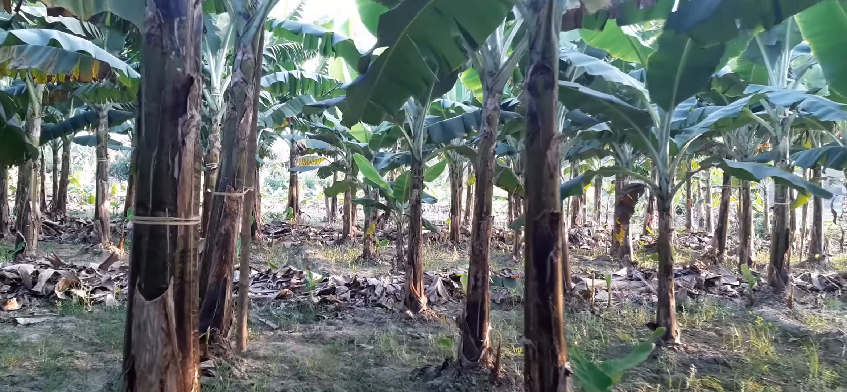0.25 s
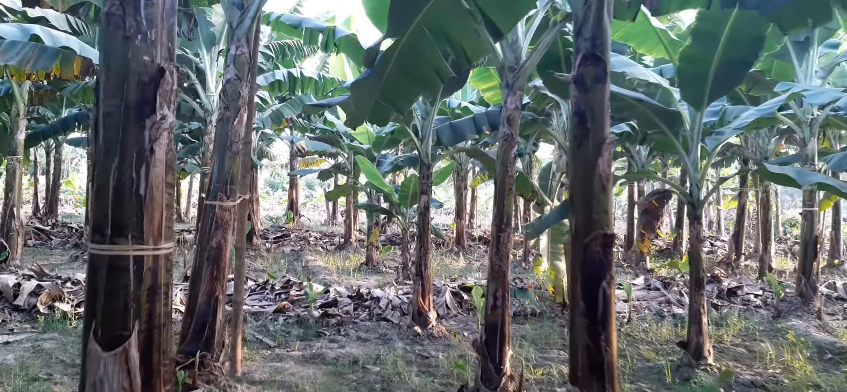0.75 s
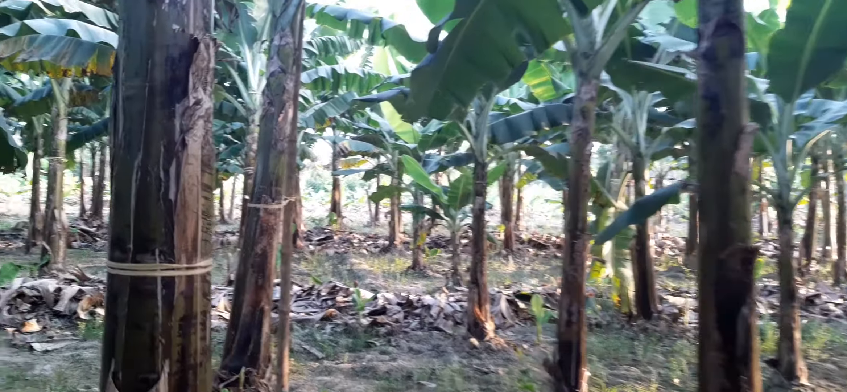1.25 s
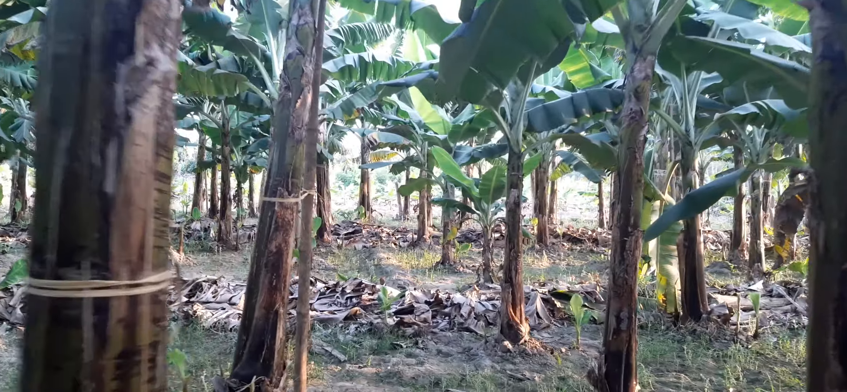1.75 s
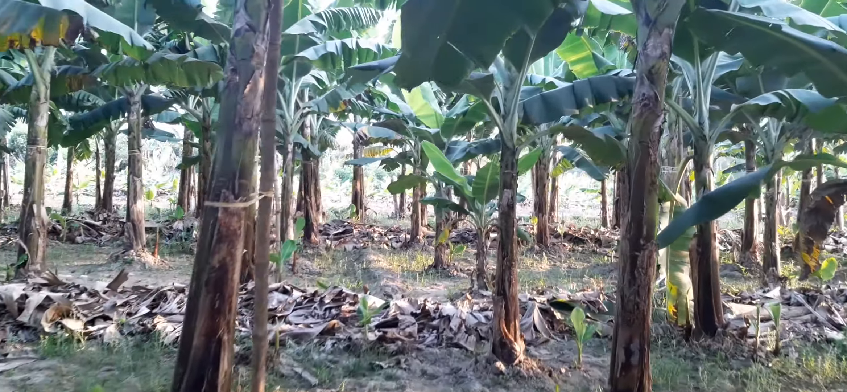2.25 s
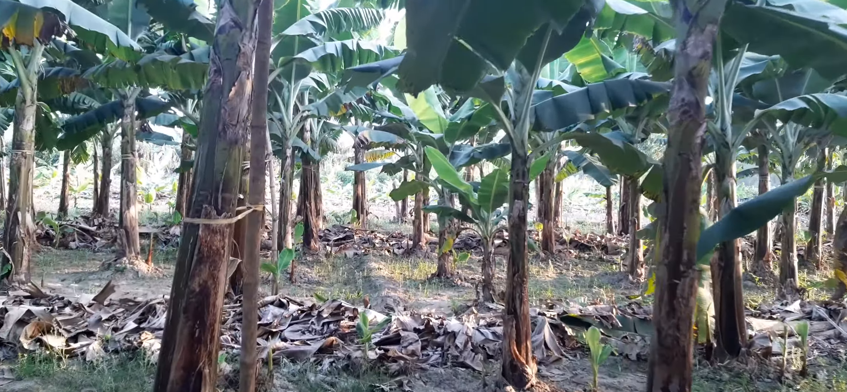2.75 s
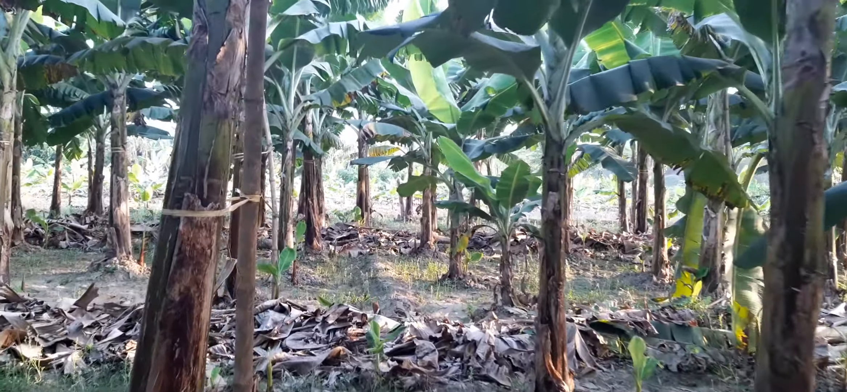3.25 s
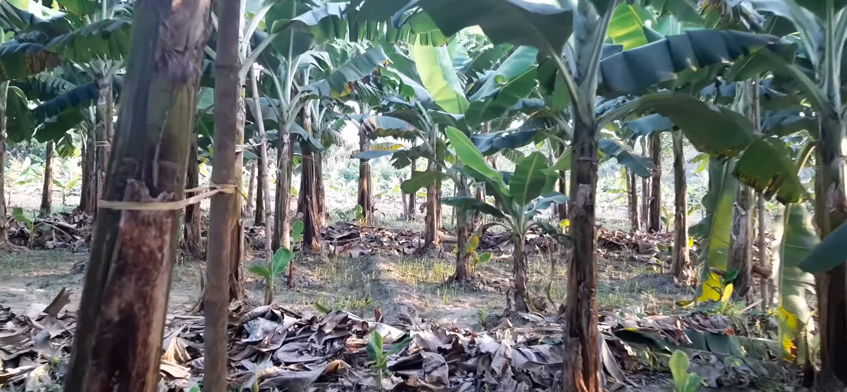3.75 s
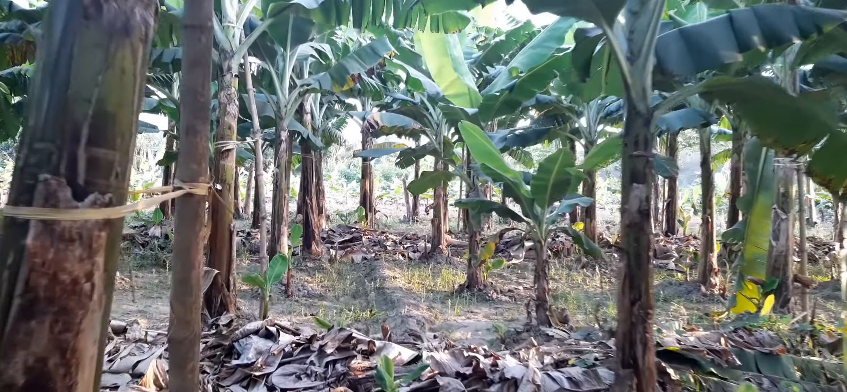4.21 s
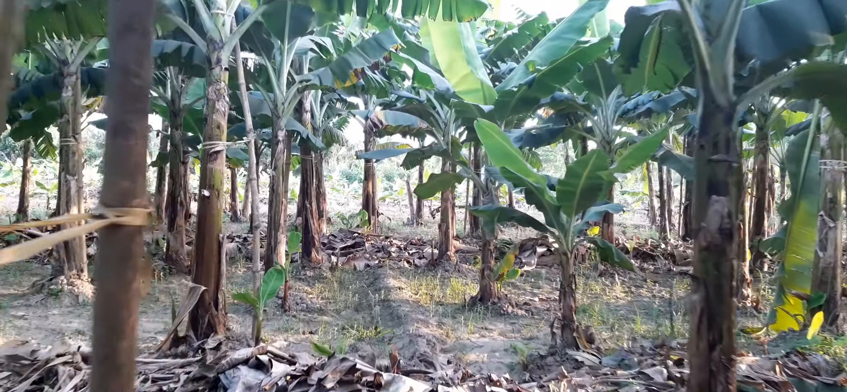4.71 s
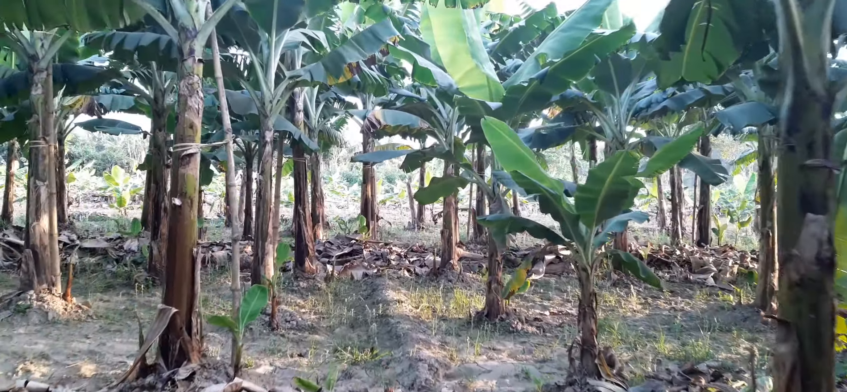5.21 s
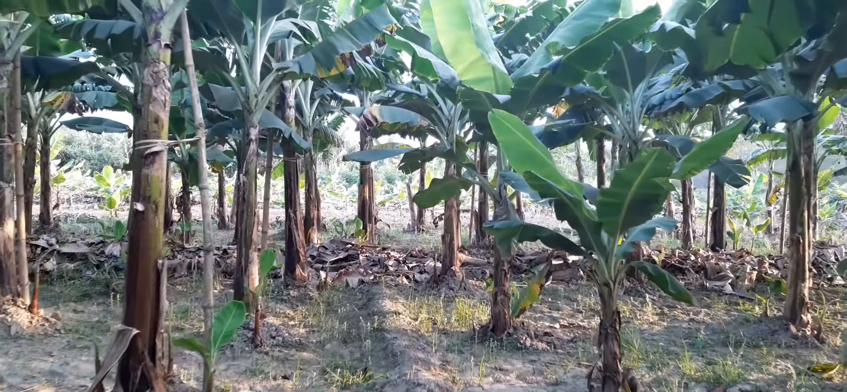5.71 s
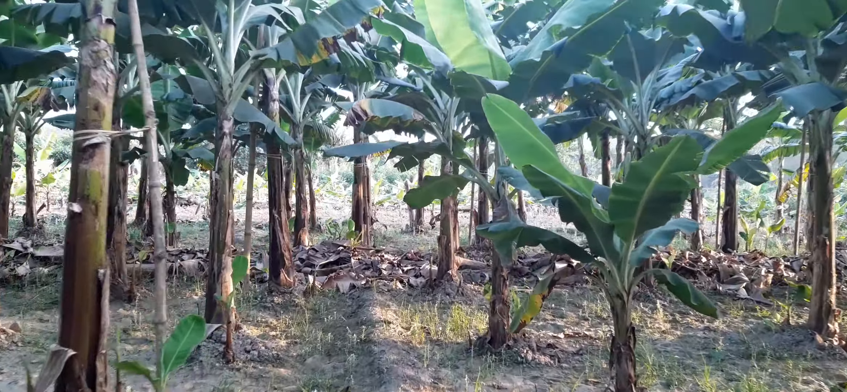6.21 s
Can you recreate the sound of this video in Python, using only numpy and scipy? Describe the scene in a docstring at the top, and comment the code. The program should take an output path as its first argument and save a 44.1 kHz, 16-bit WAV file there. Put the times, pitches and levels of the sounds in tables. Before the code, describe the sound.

Footsteps crunch and crackle through big dry fallen leaves outdoors, then brush more lightly over thin litter and grass.

```python
"""Footsteps crush a bed of big dry leaves in a plantation, then brush more lightly over litter and grass.
Each crunch is the superposition of many tiny fractures; single ribs snap out of it, and blades
spring free with a hiss. A few hollow knocks, each a heavily damped resonance, sound close by.
Behind them lie a low outdoor rumble and, in the first second, a faint, far whine."""
import sys
import numpy as np
from scipy import signal
from scipy.fft import rfft, irfft, next_fast_len
from scipy.io import wavfile
from scipy.ndimage import uniform_filter1d, map_coordinates

SR = 44100
rng = np.random.default_rng(int(sys.argv[2]) if len(sys.argv) > 2 else 0)


def pcm_store(signal):
    """Save signal as 16-bit PCM."""
    levels = np.round(np.clip(np.atleast_2d(signal), -1, 1) * 32767)
    wavfile.write(sys.argv[1], SR, levels.astype(np.int16).T)


N = 285327
TIME = np.arange(N) / SR

# Spectrum of the outdoor air. Each row: frequency in Hz, relative level in dB.
AIR_SPECTRUM = [(25, -32), (55, -4.5), (100, 2.5), (170, -12), (300, -10), (550, -17), (800, -12),
                (1300, -24.5), (4000, -35), (15000, -38.5)]
# Course of the rumble. Each row: time in seconds, level in dB.
RUMBLE_LEVELS = [(0, -59.5), (.9, -59.5), (1.3, -58.5), (3.3, -57), (4.5, -62), (5, -55), (6.1, -53),
                 (6.47, -55)]
# The whine's two glides, falling, then hovering. Each row: time in seconds, frequency in Hz, level in dB.
WHINE_GLIDES = [
    [(0, 1650, -76), (.06, 1620, -64.5), (.17, 1370, -69.5), (.27, 1320, -71), (.36, 1220, -78.5)],
    [(.54, 810, -77), (.64, 800, -64), (.72, 830, -65), (.8, 880, -69), (.9, 880, -68), (.99, 780, -69)],
]
# Spectrum of dry leaves. Each row: frequency in Hz, relative level in dB.
LEAF_SPECTRUM = [(41, -73), (70, -18.5), (228, -6.5), (274, -1), (376, -6), (494, -3), (579, -4.5),
                 (834, -2), (1280, -4), (2540, -2.5), (4280, -7.5), (7390, -11.5), (12500, -10),
                 (14900, -14), (16000, -16)]
# Blades springing free. Each row: start in seconds, level in dB, time to fall 60 dB in seconds.
BLADE_FLICKS = [(.175, -62, 0.93), (.351, -63, 0.2), (.49, -63, 0.48), (1, -48, .12), (1.447, -47, .44),
                (2.717, -20.5, 0.21), (3.832, -41, 0.46), (4.362, -50.5, 0.89), (4.474, -52, 0.22),
                (5.763, -38, .48), (6.292, -52, 0.15)]
# A foot presses or brushes the leaves. Each row: start in seconds, crunch level in dB, attack, hold
# and time to fall 20 dB in seconds, then body and crisp edges in dB relative to the crunch.
FOOT_PRESSES = [(0.335, -56, 0.017, 0.002, 0.12, 2, -9.5), (0.455, -65.5, 0.017, 0.034, 0.085, 10, -4),
                (0.997, -41.5, 0.022, 0.0067, 0.051, 3, -2), (1, -28.9, 0.1, 0.012, 0.047, 2.6, -0.2),
                (1.134, -40.0, 0.026, 0.016, 0.039, 1.5, 0.5), (1.198, -50.5, 0.029, 0.0, 0.26, 1.5, 1.5),
                (1.355, -43.0, 0.15, 0.066, 0.22, 0.3, -1.6), (1.36, -46.5, 0.018, 0.0075, 0.17, 0.5, -2.5),
                (1.58, -40.5, 0.12, 0.05, 0.1, 2.5, -1.5), (1.728, -29, 0.032, 0.0077, 0.099, -3.5, -6),
                (1.751, -20.5, 0.076, 0.088, 0.069, 0, -3.0), (1.942, -21.5, 0.11, 0.045, 0.06, -3.6, -5),
                (2.077, -24, 0.1, 0.0095, 0.097, -2.5, -3), (2.179, -29.5, 0.074, 0.045, 0.25, -0.2, -2),
                (2.35, -27.0, 0.11, 0.028, 0.06, -3.5, -6), (2.506, -41.0, 0.047, 0.076, 0.1, -3, -6.2),
                (2.66, -29.5, 0.008, 0.012, 0.098, 3, -3.4), (2.662, -26, 0.047, 0.18, 0.1, 1, -2.3),
                (2.885, -21, 0.061, 0.056, 0.19, 0.5, -1.7), (2.991, -33.5, 0.121, 0.054, 0.2, 1.5, -7),
                (3.155, -46.5, 0.25, 0.078, 0.23, 3.5, -3), (3.377, -42.5, 0.3, 0.1584, 0.2, 0, -5),
                (3.794, -31, 0.045, 0.062, 0.14, 1, -5), (3.944, -36.0, 0.059, 0.08, 0.33, -1, -8),
                (4.446, -47, 0.029, 0.0087, 0.21, 2, -5), (4.477, -45.5, 0.38, 0.012, 0.08, -6, -3.5),
                (4.847, -42.0, 0.11, 0.029, 0.15, 4, -2), (4.901, -36, 0.227, 0.016, 0.26, 1.5, -1.1),
                (5.098, -48, 0.19, 0.049, 0.8, -2.95, -5), (5.561, -45.5, 0.059, 0.11, 0.22, 1.8, -3.5),
                (5.737, -38, 0.033, 0.02, 0.078, 0.3, -2), (5.908, -48.5, 0.103, 0.052, 0.35, -1.5, -5),
                (6.381, -57.9, 0.016, 0.003, 0.081, -2.2, -1.1)]
# Deep leaves give way to thin litter on grass. Each row: time in seconds, thinness from 0 to 1.
GROUND_THINNESS = [(3, 0.01), (3.4, .4), (4.3, .45), (4.9, 0.99)]
# Direction of the feet. Each row: time in seconds, lead of the left microphone in ms.
FOOT_BEARING = [(0, .06), (1.11, 0.19), (1.8, 0.058), (3, 0.085), (4.1, .18), (5.1, -.18), (6.4, -0.13)]
# Body of a crunch: thud of the sole, pressed leaf bed, hollow curled blades. Each row: lower and upper
# edge in Hz, offset from the body level in dB, dB lost per dB of effort, dB gained on thin ground,
# dB gained per dB of dullness.
BODY_BANDS = [(62, 193, -24, 0.0244, 8, 0.83), (238.4, 575, -8.5, 0.06, 1, 0),
              (716, 960, -6, 0.1132, -5, 0.5)]
# Hollow knocks. Each row: start in seconds, level in dB, pitch in Hz.
HOLLOW_KNOCKS = [(.357, -39, 810), (0.482, -31.5, 786), (1.161, -23, 744), (2.19, -14.5, 435),
                 (2.668, -19, 353), (3.275, -26, 650), (3.916, -21.5, 820.7), (4.084, -24, 800.3),
                 (4.543, -36, 883), (5.686, -23.5, 378), (6.328, -25, 865)]
# Thick ribs and stalks breaking. Each row: start in seconds, nominal peak in dB, treble boost in dB.
RIB_SNAPS = [(.671, -52, -4), (1.16, -20.5, -11), (1.384, -23, 1), (1.45, -20, 8), (1.535, -16, 0),
             (1.752, -6.5, 10), (1.773, -5, -5), (1.877, 0, -1), (1.997, -7, -5), (2.044, -3, 2),
             (2.066, 0.5, -4.5), (2.083, -4.5, -7), (2.103, -3.5, -14), (2.178, -6, -12), (2.184, 1, -5),
             (2.22, -7, -2), (2.261, -6.5, -4), (2.294, -1.5, -8), (2.374, -2.5, 3.5), (2.447, -4.5, -0.5),
             (2.469, -3.5, 1), (2.551, -12, -4.5), (2.577, -15, -4), (2.668, -11, -15), (2.719, -2.5, 18),
             (2.838, -4.5, -6), (2.854, -0.5, -1), (2.883, -5.5, -8), (3.25, -23, -15), (3.464, -23.5, 6),
             (4.005, -15, -17), (4.477, -24, -10), (5.466, -34, -10), (6.108, -30, -4)]


def amp(db):
    """Amplitude ratio of a level in decibels."""
    return 10 ** (np.asarray(db) / 20)


def unit(x):
    """The signal normalised to rms 1."""
    return x / np.sqrt(np.mean(x ** 2) + 1e-20)


def along(points, hz):
    """A spectrum interpolated on a logarithmic frequency axis."""
    knots_hz, db = np.transpose(points)
    return np.interp(np.log(hz + 1), np.log(knots_hz), db)


def curves(rows):
    """Each column after the time, interpolated to every sample."""
    times, *columns = np.transpose(rows)
    return [np.interp(TIME, times, column) for column in columns]


def wobble(rate):
    """A smooth random modulation with rate knots a second."""
    return map_coordinates(rng.standard_normal(int(N * rate / SR) + 4), [TIME * rate], order=2)


def filtered(x, gain, size=8192):
    """Convolution with the minimum-phase filter of magnitude gain(Hz)."""
    cepstrum = irfft(np.log(np.maximum(gain(np.fft.rfftfreq(size, 1 / SR)), 1e-6)))
    cepstrum[1:size // 2] *= 2
    cepstrum[size // 2 + 1:] = 0
    response = irfft(np.exp(rfft(cepstrum)))[:size // 2]
    padded = next_fast_len(x.shape[-1] + size // 2, real=True)
    return irfft(rfft(x, padded) * rfft(response, padded), padded)[..., :x.shape[-1]]


def below(hz, edge_hz, order=3):
    """Magnitude response of a low-pass."""
    return 1 / np.sqrt(1 + (hz / edge_hz) ** (2 * order))


def above(hz, edge_hz, order=3):
    """Magnitude response of a high-pass."""
    return (hz / edge_hz) ** order * below(hz, edge_hz, order)


def add(track, start_s, sound):
    """Superposition: the sound is summed into the track from start_s."""
    part = track[:, max(round(start_s * SR), 0):][:, :sound.shape[1]]
    part += sound[:, :part.shape[1]]


def diffuse(size, split_hz):
    """A diffuse field is coherent at two microphones in the bass and incoherent in the treble."""
    mid, side = rng.standard_normal((2, size))
    side = signal.lfilter([1, -1], [1, -np.exp(-2 * np.pi * split_hz / SR)], side)  # a gentle high-pass
    return np.array([mid + side, mid - side])


def outdoor_rumble():
    """Ambient noise heaves under a trace of hiss; moving air stirs the right microphone more."""
    air = diffuse(N, split_hz=920) + amp([[-14], [-9]]) * rng.standard_normal((2, N))
    rumble = unit(filtered(air, lambda hz: amp(along(AIR_SPECTRUM, hz))))
    draught = filtered(rng.standard_normal((2, N)), lambda hz: above(hz, 59, order=4) * below(hz, 79))
    draught = unit(draught * amp(3 * wobble(4.8)))
    level_db, = curves(RUMBLE_LEVELS)
    return amp(level_db) * (rumble * amp(2.1 * wobble(30)) + amp([[-18], [-6]]) * draught)


def far_whine(width_hz=85, fade_s=0.043, overtone_db=-24):
    """Random modulation by the trees spreads a far tone and its third harmonic into narrow bands."""
    tone = np.zeros(N)
    for glide in WHINE_GLIDES:
        pitch_hz, db = curves(glide)
        inside_s = np.minimum(TIME - glide[0][0], glide[-1][0] - TIME)
        gate = np.clip(inside_s / fade_s + 1, 0, 1)
        blur = wobble(2 * width_hz) + 1j * wobble(2 * width_hz)
        phasor = np.exp(2j * np.pi * np.cumsum(pitch_hz) / SR)
        tone += gate * amp(db) * unit(np.real(blur * (phasor + amp(overtone_db) * phasor ** 3)))
    return filtered(tone, lambda hz: below(hz, 3000))


def blade_flicks(grain_db=3):
    """Friction: a dry blade springs free and slides to rest, its grainy hiss decaying exponentially."""
    envelope, t = np.zeros((1, N)), np.arange(SR // 2) / SR
    for start, db, t60 in BLADE_FLICKS:
        add(envelope, start, amp(db - 60 * t / t60)[None])
    noise = diffuse(N, split_hz=900)
    hiss = filtered(noise, lambda hz: amp(along(LEAF_SPECTRUM, hz)) * above(hz, 4000, order=1))
    return envelope * unit(hiss * amp(grain_db * wobble(700)))


def press_levels():
    """Incoherent sources add in power: the presses sum to crunch, body and crisp levels in dB."""
    power = np.zeros((3, N)) + amp(-100) ** 2
    for start, db, attack_s, hold_s, release_s, body_db, crisp_db in FOOT_PRESSES:
        swell = np.clip((TIME - start) / attack_s, 0, 1) ** 2
        ebb_db = -20 * np.clip((TIME - start - attack_s - hold_s) / release_s, 0, 6)
        power += (swell * amp(db + ebb_db) * amp([[0], [body_db], [crisp_db]])) ** 2
    return 10 * np.log10(power)


def collapses(per_s, fade_s):
    """Relaxation: each collapse of the litter leaps up and ebbs exponentially. Mean 0, rms 1."""
    kicks = (rng.random(N) < per_s / SR) * rng.uniform(0.69, 1, N)
    level = signal.lfilter([1], [1, -np.exp(-1 / (fade_s * SR))], kicks)
    return unit(level - level.mean())


def fracture(crack_t60, ring_hz, ring_cycles, ring_db, scatter_db, scatter_t60):
    """Brittle fracture: a crack, damped vibration of the blade, and scattering from leaves around."""
    t = np.arange(SR // 14) / SR
    crack = unit(np.tanh(2 * rng.standard_normal(len(t))) * amp(-60 * t / crack_t60))
    stiffness = np.exp(.5 * rng.standard_normal())  # stiffer blades ring higher and harder
    hz = ring_hz * stiffness
    ring = np.sqrt(stiffness) * unit(np.sin(2 * np.pi * hz * t) * amp(-60 * t * hz / ring_cycles))
    scatter = unit(diffuse(len(t), split_hz=690) * amp(-60 * t / scatter_t60))
    return unit(crack + amp(ring_db) * ring + amp(scatter_db) * scatter)


def crackle(per_s, size_db, clump_db, spread_ms, leaf_count=18):
    """Shot noise: random fractures, each from its own direction; a sparser swarm clumps more."""
    lead_ms, = curves(FOOT_BEARING)
    onsets = np.flatnonzero(rng.random(N) < per_s / SR)
    surge = np.minimum(collapses(per_s=110, fade_s=0.04)[onsets], 2)
    surge_db = clump_db * np.sqrt(1500 / per_s[onsets]) * surge
    jitter_db = size_db * np.clip(rng.standard_normal(N)[onsets], -2, 1.6)
    size = amp(surge_db + jitter_db) * rng.choice([-1, 1], N)[onsets]
    size /= np.sqrt(per_s[onsets])  # many small breaks carry the same power as a few large ones
    half_lag = (lead_ms[onsets] + spread_ms * rng.standard_normal(N)[onsets]) * SR / 2000
    arrivals = np.rint([onsets - half_lag, onsets + half_lag]).astype(int) % N
    swarm = np.zeros((2, N))
    for k in range(leaf_count):
        breaks = np.array([np.bincount(side[k::leaf_count], size[k::leaf_count], N) for side in arrivals])
        leaf = fracture(crack_t60=.003, ring_hz=1900, ring_cycles=16, ring_db=-12,
                        scatter_db=-3, scatter_t60=.05)
        swarm += signal.oaconvolve(breaks, leaf, axes=1)[:, :N]
    return swarm


def bending(x, depth_db):
    """Resonance depends on shape: as leaves deform under load, narrow peaks come and go."""
    spectra = signal.stft(x, nperseg=1024)[2]
    peaks = uniform_filter1d(rng.standard_normal(spectra.shape[1:]), size=3, axis=0)  # across frequency
    peaks = uniform_filter1d(peaks, size=7, axis=1)  # across time
    return signal.istft(spectra * amp(depth_db * unit(peaks)), nperseg=1024)[1][:, :N]


def footsteps(medium_press_db=-35, medium_per_s=1100, doubling_db=8.5, thin_doublings=2.3):
    """Crushing under load: weight gives the bass, folding blades the crunch, shattering edges the top."""
    crunch_db, body_db, crisp_db = press_levels()
    thin, = curves(GROUND_THINNESS)
    effort_db, dull_db = crunch_db - medium_press_db, crunch_db - crisp_db
    # Fractures come faster under more weight and in the fine, thin litter.
    per_s = np.maximum(medium_per_s * 2 ** (effort_db / doubling_db + thin_doublings * thin), 650)
    swarm = bending(crackle(per_s, size_db=0.34, clump_db=0.8, spread_ms=.085), depth_db=1.97)

    def band(lo_hz, hi_hz):
        return unit(filtered(swarm, lambda hz: amp(along(LEAF_SPECTRUM, hz))
                             * above(hz, lo_hz, order=6) * below(hz, hi_hz, order=6)))

    body = sum(amp(body_db + db - loss * effort_db + thin_db * thin + gain * dull_db) * band(lo_hz, hi_hz)
               for lo_hz, hi_hz, db, loss, thin_db, gain in BODY_BANDS)
    tilt_db = 0.21 * dull_db  # a press with dull edges also crunches lower
    lower = amp(crunch_db - 5 + tilt_db) * band(1157, 2035)
    upper = amp(crunch_db - 4.5 - tilt_db) * band(2620, 4590)
    crisp = amp(crisp_db) * band(5440, 18500)
    return body + lower + upper + crisp


def hollow_knocks(swell_s=0.00057, tail_db=-19, tail_t60=0.13):
    """Damped resonance: a soft contact excites a few cycles of one low mode and a short, dull tail."""
    track, t = np.zeros((2, N)), np.arange(SR // 5) / SR
    for start, db, pitch_hz in HOLLOW_KNOCKS:
        mode = np.sin(2 * np.pi * pitch_hz * t) * t / swell_s * np.exp(1 - t / swell_s)
        knock = filtered(mode, lambda hz: above(hz, .6 * pitch_hz) * below(hz, 1.5 * pitch_hz, order=6))
        tail = filtered(diffuse(len(t), split_hz=550),
                        lambda hz: above(hz, .7 * pitch_hz, order=2) * below(hz, 1.25 * pitch_hz, order=6))
        add(track, start, amp(db) * (knock + unit(tail) * amp(tail_db - 60 * t / tail_t60)))
    return track


def rib_snaps(lead_ms=.08, spread_ms=.05, tear_s=0.0018, tear_db=-6, crest_db=15):
    """Crack propagation: ribs give way one at a time; each cracks, then tears a little further."""
    track = np.zeros((2, N))
    for start, db, treble_db in RIB_SNAPS:
        crack, tear = [fracture(crack_t60=.006, ring_hz=1600, ring_cycles=12, ring_db=-12,
                                scatter_db=-5, scatter_t60=.08) for _ in range(2)]
        add(crack, tear_s * rng.uniform(.5, 1.7), amp(tear_db) * tear)
        snap = filtered(crack, lambda hz: amp(along(LEAF_SPECTRUM, hz) + treble_db * above(hz, 4800))
                        * above(hz, 300, order=2), size=2048)
        snap *= amp(db - crest_db) / np.std(snap[:, :SR // 200])  # a crack peaks well above its rms
        half_lag_s = (lead_ms + spread_ms * rng.standard_normal()) / 2000
        add(track, start - half_lag_s, snap * [[1], [0]])
        add(track, start + half_lag_s, snap * [[0], [1]])
    return track


def scene():
    """Superposition in the open air, with the feet close below the microphones."""
    return footsteps() + blade_flicks() + hollow_knocks() + far_whine() + outdoor_rumble() + rib_snaps()


def record(dry, ceiling=.85, top_hz=16000):
    """Soft saturation rounds the highest peaks; a band limit removes everything above top_hz."""
    rounded = dry / (1 + (dry / ceiling) ** 4) ** .25
    padded = next_fast_len(N + SR // 2)
    passband = np.fft.rfftfreq(padded, 1 / SR) < top_hz
    return irfft(rfft(rounded, padded) * passband, padded)[:, :N]


dry = scene()
out = record(dry)
pcm_store(out)
```